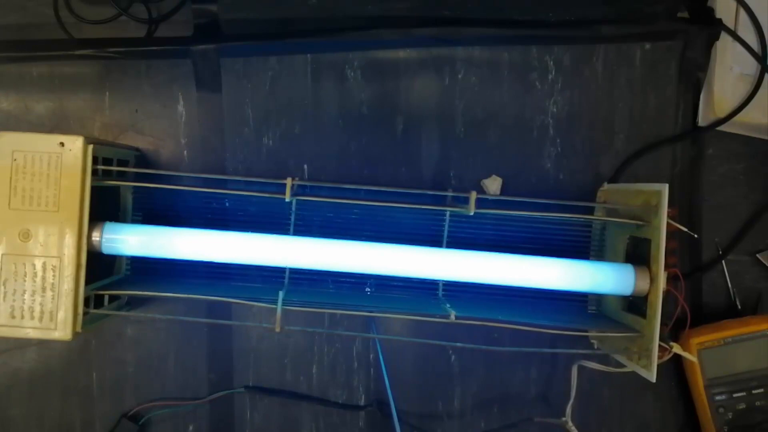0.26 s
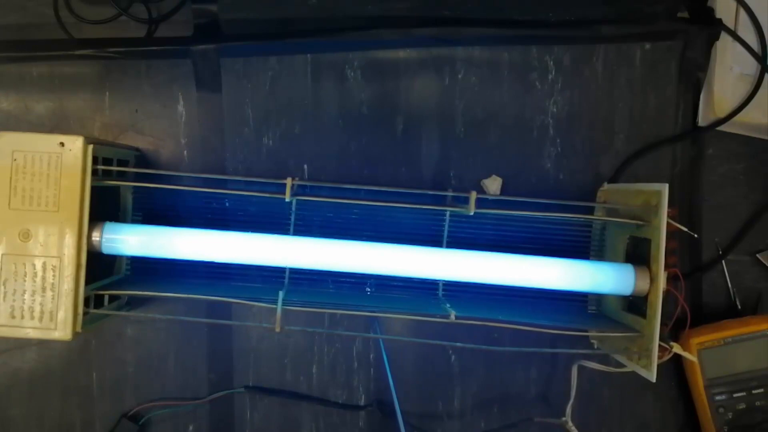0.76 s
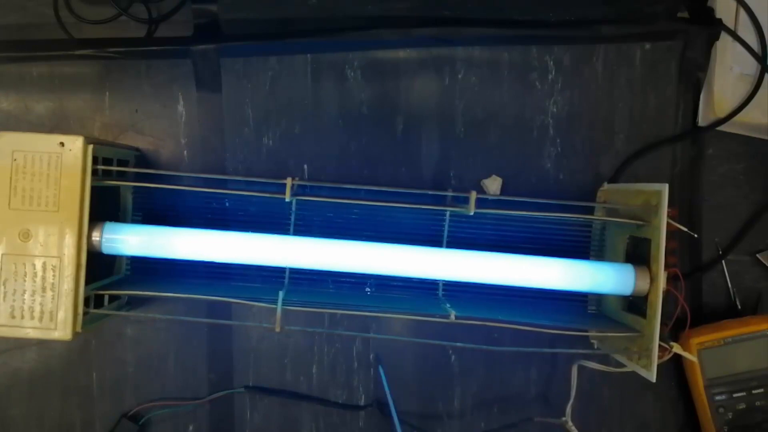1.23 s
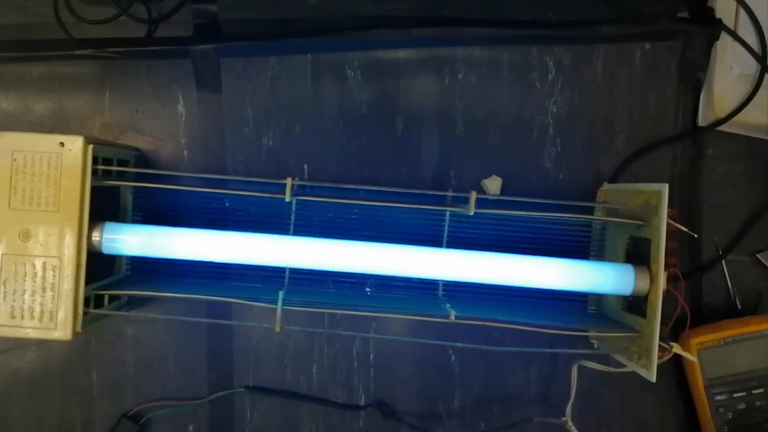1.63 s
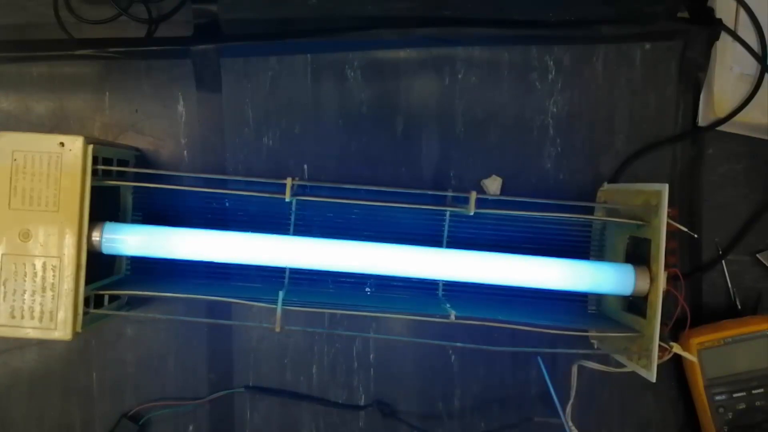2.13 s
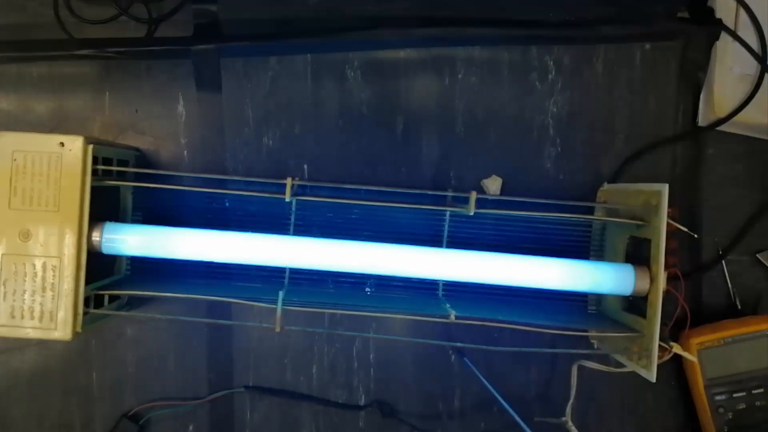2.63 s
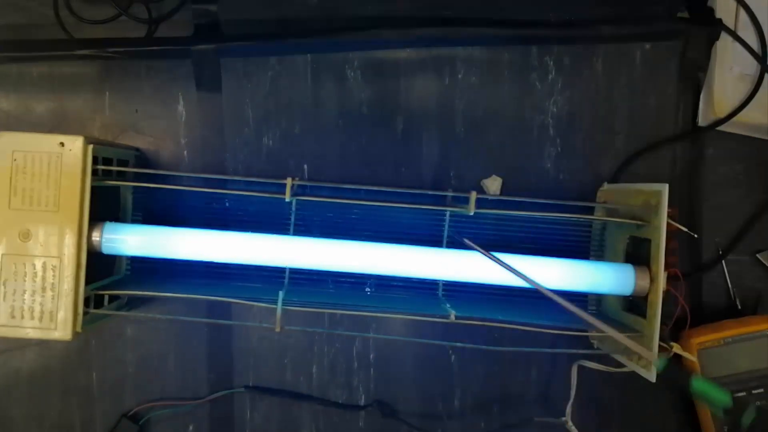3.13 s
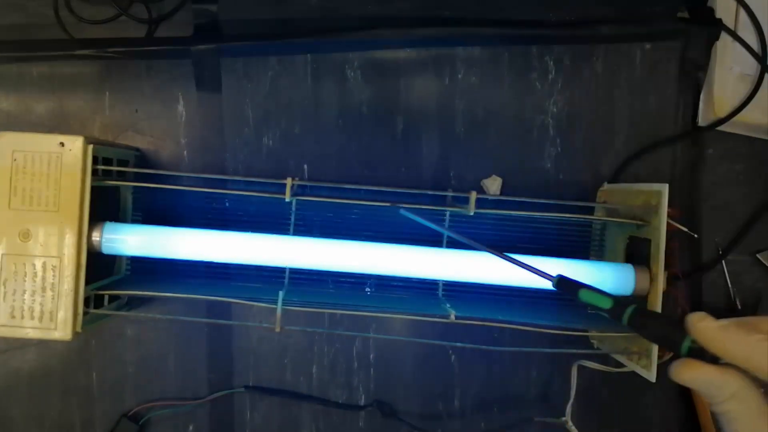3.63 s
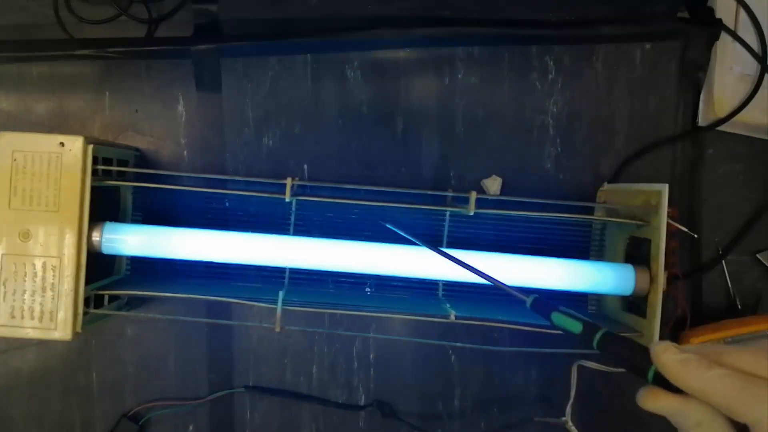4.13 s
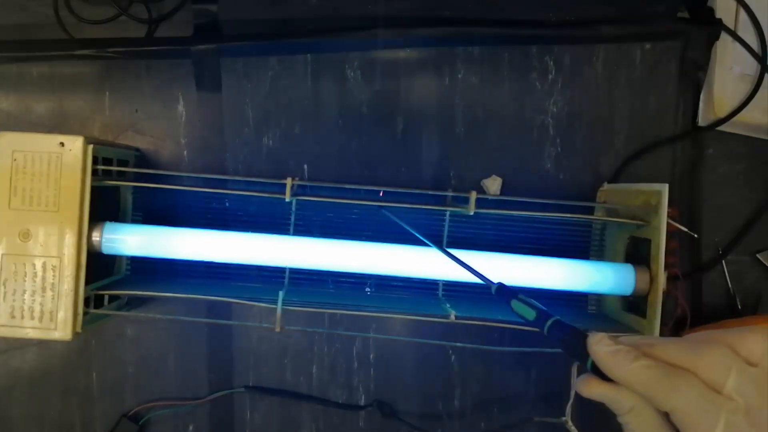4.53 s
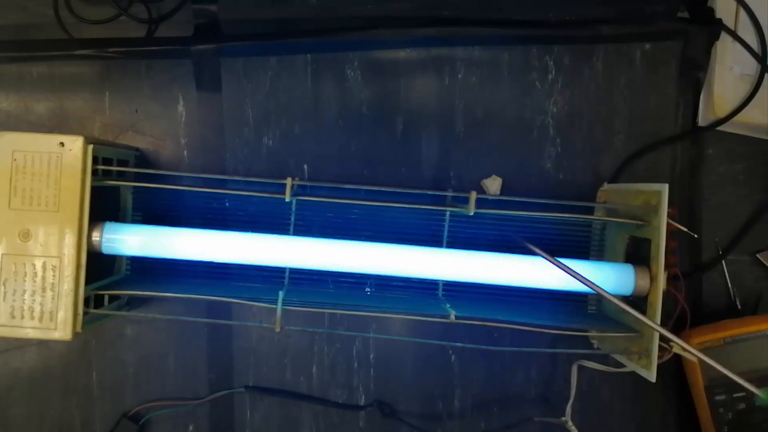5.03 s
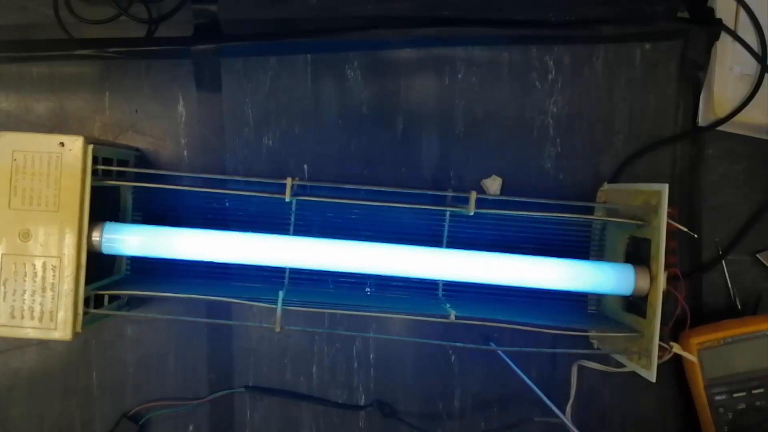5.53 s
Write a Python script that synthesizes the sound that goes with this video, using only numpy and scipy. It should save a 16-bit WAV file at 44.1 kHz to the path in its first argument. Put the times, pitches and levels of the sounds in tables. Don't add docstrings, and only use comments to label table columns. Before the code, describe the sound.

In a small workshop, a faint low electrical hum, soft room rumble and airy hiss are broken by a sudden deafening spark crack. The background drops, then creeps back. Faint sleeve rustles, bench knocks and tool ticks follow, then a second, stronger crack. Close stereo microphone overloads on both.

```python
import sys
import numpy as np
from scipy import signal
from scipy.io import wavfile

SR = 44100
rng = np.random.default_rng(int(sys.argv[2]) if len(sys.argv) > 2 else 0)


def master_out(mix):
    frames = np.transpose(np.atleast_2d(mix))
    ceiling = np.clip(frames, -1, 1)
    pcm = np.round(ceiling * 32767).astype(np.int16)
    wavfile.write(sys.argv[1], SR, pcm)


def volts_from_db(level):
    exponent = np.asarray(level, float) / 20
    return 10 ** exponent


N = 254080

# centre_hz, density_db_per_hz, left_right_likeness
AIR_SPECTRUM = [(25, -84, 0.48), (58.4, -84.5, 0.98), (128, -89, 0.64), (276, -91, 0.9), (567, -93, 0.29),
                (758.1, -96, 0.046), (1100, -101, -0.02), (1660, -110, -.2), (2280, -110, 0.56),
                (3300, -106, 1), (3940, -116, -2.02), (5900, -119, 1), (9000, -124, 1),
                (14000, -131, -2.04)]
# time_s, level_db
NOISE_STIR = [(0, -2), (.5, -0.5), (1.0, 2.5), (1.55, 0), (1.8, -3), (2.1, -3.5), (2.5, -1), (2.9, -1.5),
              (3.3, -0.1), (3.7, -0.6), (4.0, 2), (4.4, -1.5), (4.9, 4), (5.3, -0.5), (5.5, -2), (5.76, -1)]
# centre_hz, width_hz, level_db
CAPSULE_PEAK = [(14900, 900, 9)]
# centre_hz, width_hz, level_db
ROOM_MODES = [(74.1, 18, -66), (101.36, 9.6, -79.5), (305.4, 14, -71.5), (491.5, 25, -72.5)]
# top_s, level_db, half_length_s
RUMBLE_SWELLS = [(0.02, -58.5, 0.18), (0.605, -57, 0.12), (0.993, -60, .1), (1.559, -60.5, .14),
                 (2.063, -64, 0.047), (2.46, -64, 0.1), (3.04, -63.5, 0.13), (3.352, -60.5, 0.093),
                 (3.597, -64, 0.085), (3.93, -64, 0.16), (4.412, -62.5, 0.15), (4.9, -60, .08),
                 (5.35, -58, 0.15)]
# top_s, level_db, rise_s, fall_s
SLEEVE_RUSTLES = [(1.97, -69.5, 0.048, .06), (2.46, -70.5, 0.27, 0.22), (2.645, -62, 0.014, 0.076),
                  (2.82, -71, 0.042, .06), (3.2, -71, 0.27, .05), (3.33, -60.5, 0.052, .04),
                  (3.775, -64, .004, .04), (3.88, -67, 0.031, .03), (3.975, -62.5, 0.035, 0.023),
                  (4.5, -71, 0.073, .06), (5.3, -75, .1, 0.097)]
# start_s, peak_db, top_hz
HANDLE_TICKS = [
    (2.459, -62, 11910),
    (3.2858, -48, 7500),
    (3.3007, -55, 15000),
    (3.317, -49, 7500),
    (3.5327, -63.5, 9000),
    (3.596, -57, 9000),
    (3.671, -64, 9000),
]
# start_s, level_db, pitch_hz, fade_s
BENCH_KNOCKS = [
    (1.927, -36.5, 70.5, 0.0068),
    (2.04, -46, 55.4, 0.011),
    (3.785, -53, 676, 0.011),
    (3.78, -58, 955, 0.013),
    (3.928, -61.5, 962, 0.017),
    (4.0, -65, 958, 0.033),
]
# start_s, crack_db, room_db, tail_pace (1 = normal)
SPARKS = [
    (1.108, 1.5, 5, 0.95),
    (4.618, 5, 4.5, 1.025),
]
# centre_hz, density_db_per_hz, extra_decay_db_per_s
TAIL_SPECTRUM = [(150, -89, 150.5), (400, -86, 100.5), (700, -86.5, 36), (1040, -81.5, 32),
                 (1600, -73.5, 20.5), (2460, -73.5, 19), (3496, -73.5, 6.5), (4860, -71, -0.5),
                 (6030, -69, -2), (7926, -67.5, 27.5), (10400, -62.5, 39.5), (12500, -73, 52.5),
                 (13800, -67, 40), (15000, -71.5, 70)]
# pitch_hz, left_db, right_db, fade_s
SPARK_RINGS = [
    [(720, -15, -14.5, 0.0016), (1116, -21.5, -17.5, 0.0029), (2010, -20.5, -2, 0.00099),
     (9760, -9, -31, .003)],
    [(1007, -33.5, -28.5, .003), (2000, -7.5, -26, 0.0011), (3134, -12, -15, 0.0016),
     (6230, -24.5, 4, 0.00081)],
]
# left_swing_db, right_sag_db, left_sag_share, recovery_db, lead_in_db
OVERLOAD = [
    (-6.5, -4, 0.14, -33, -14.5),
    (-11.5, -4, -0.14, -33.5, -23.5),
]
# centre_hz, width_hz, level_db
LEFT_PORT = [(10000, 2400, 4.5), (9660, 4700, 5), (3820, 2700, -4.5)]
RIGHT_PORT = [(5500, 4600, 13), (4125, 850, -12.5), (8600, 2400, -22)]

HUM_HZ, HUM_DB, HUM_FOLLOWS_STIR = 200.1, -61.5, 0.52
RUMBLE_HZ, RUMBLE_BED_DB = 46.3, -78
DUCK_BASS_DB, DUCK_TREBLE_DB, DUCK_LEFT_OVER_DB = -17.5, -20, -1.5
DUCK_FALL_S, DUCK_HOLD_S, DUCK_RELEASE_S = 0.015, 0.23, 0.13
DUCK_HISS_DB, DUCK_HISS_RELEASE_S = -7, 0.31
FIRST_ECHO_DB, FIRST_ECHO_S, DECAY_DB_PER_S = 10, 0.008, 66.5
GATE_S, GATE_DB_PER_S, GATE_KNEE_S, GATE_DEPTH_DB, GATE_FOLLOWS = 0.32, 260, 0.03, 29, 0.0016
LEFT_BASS_CUT_HZ, LEFT_LAG_SAMPLES, RIGHT_DB, SELF_NOISE_DB = 61, 2, 2, -80.5


def at_hz(spectrum, hz, column=1):
    table = np.array(spectrum)
    return np.interp(np.log(hz), np.log(table[:, 0]), table[:, column])


def stir_db():
    times_s, levels_db = np.transpose(NOISE_STIR)
    return np.interp(np.arange(N) / SR, times_s, levels_db)


def add_at(out, start_s, sound):
    out[:, round(start_s * SR):][:, :sound.shape[-1]] += sound


def drift(rate_hz, size):
    r = np.exp(-80 * np.pi * rate_hz / SR)
    white = rng.standard_normal(size // 40 + 2002)
    slow = signal.lfilter([1], [1, -2 * r, r * r], white)[2000:]
    return np.interp(np.arange(size) / 40, np.arange(len(slow)), slow / slow.std())


def band_pass(x, low_hz, high_hz, order=2):
    return signal.sosfilt(signal.butter(order, [low_hz, high_hz], "band", fs=SR, output="sos"), x)


def bands(size, low_hz):
    edges = low_hz * 2 ** (np.arange(40) / 3)
    edges = edges[edges < 0.45 * SR]
    white = rng.standard_normal((2, 2, size)) * np.sqrt(SR / 2)
    for k, (low, high) in enumerate(zip(edges, edges[1:])):
        yield np.sqrt(low * high), band_pass(white[k % 2], low, high, order=3)


def narrow_noise(hz, width_hz):
    x = band_pass(rng.standard_normal(N + SR), hz - width_hz / 2, hz + width_hz / 2)[SR:]
    return x / x.std()


def peaks(x, table):
    for hz, width_hz, db in table:
        w, a = 2 * np.pi * hz / SR, volts_from_db(db / 2)
        q = np.sin(w) * width_hz / hz / 2
        rise = [1 + q * a, -2 * np.cos(w), 1 - q * a]
        fall = [1 + q / a, -2 * np.cos(w), 1 - q / a]
        x = signal.lfilter(rise, fall, x)
    return x


def humps(rows):
    t = np.arange(N) / SR
    total = 0
    for top_s, db, rise_s, fall_s in rows:
        distance = np.where(t < top_s, (top_s - t) / rise_s, (t - top_s) / fall_s)
        total = total + volts_from_db(db) * np.exp(-distance ** 1.5)
    return total


def ducking():
    depth, hiss_depth, left_over_db = 0, 0, 0
    for start_s, _, _, pace in SPARKS:
        after = np.maximum(np.arange(N) / SR - start_s, 0) * pace
        held = np.maximum(after - DUCK_HOLD_S, 0)
        depth = depth + (1 - np.exp(-after / DUCK_FALL_S)) * np.exp(-held / DUCK_RELEASE_S)
        hiss_depth = hiss_depth + (after > 0) * np.exp(-(held / DUCK_HISS_RELEASE_S) ** 2)
        left_over_db = left_over_db + DUCK_LEFT_OVER_DB * (after > 0)
    bass_db = left_over_db + DUCK_BASS_DB * depth
    treble_db = left_over_db + DUCK_TREBLE_DB * depth
    return bass_db, treble_db, DUCK_HISS_DB * hiss_depth


def capsule_hiss(hiss_db, treble_db):
    level_db = SELF_NOISE_DB + hiss_db + 0.4 * treble_db + stir_db()
    hiss = np.diff(rng.standard_normal((2, N + 1))) * volts_from_db(level_db)
    return signal.sosfilt(signal.butter(2, 12000, fs=SR, output="sos"), peaks(hiss, CAPSULE_PEAK))


def air(bass_db, treble_db):
    out, together, stir = 0, drift(1.5, N), stir_db()
    for hz, (mid, side) in bands(N, low_hz=20.47):
        alike = np.clip(at_hz(AIR_SPECTRUM, hz, column=2), -1, 1)
        treble_share = np.clip(np.log2(hz / 500) / 0.68, 0, 1)
        duck_db = bass_db + treble_share * (treble_db - bass_db)
        waver_db = 1.1 * together + 0.96 * drift(6, N)
        gain = volts_from_db(at_hz(AIR_SPECTRUM, hz) + duck_db + treble_share * stir + waver_db)
        stereo = np.sqrt(1 + alike) * mid + np.sqrt(1 - alike) * side * [[1], [-1]]
        out = out + gain * stereo / np.sqrt(2)
    return out


def transformer_hum():
    phase = 2 * np.pi * np.cumsum(HUM_HZ + 0.83 * drift(1.2, N)) / SR
    level_db = HUM_DB + HUM_FOLLOWS_STIR * stir_db() + 1.1 * drift(8.3, N)
    return np.sqrt(2) * volts_from_db(level_db) * np.sin(phase)


def room_rumble():
    phase = 2 * np.pi * np.cumsum(RUMBLE_HZ + 3 * drift(4, N)) / SR
    swells = humps([(top_s, db, half_s, half_s) for top_s, db, half_s in RUMBLE_SWELLS])
    rumble = (swells + volts_from_db(RUMBLE_BED_DB)) * volts_from_db(9 + 2.0 * drift(6, N)) * np.sin(phase)
    modes = sum(volts_from_db(db) * narrow_noise(hz, width_hz) for hz, width_hz, db in ROOM_MODES)
    return rumble + modes


def sleeve_rustle():
    grains = rng.standard_normal((2, N)) * volts_from_db(2.0 * drift(60, N) - 2) * humps(SLEEVE_RUSTLES)
    return band_pass(grains, 3500, 7000) + volts_from_db(-7) * band_pass(grains, 7000, 14000)


def handle_ticks():
    out, t = np.zeros((2, N)), np.arange(SR // 12) / SR
    fade = np.exp(-t / 0.0005) + 0.5 * np.exp(-t / 0.0045)
    for start_s, db, top_hz in HANDLE_TICKS:
        puff = volts_from_db(db - 5.0) * fade * rng.standard_normal((2, len(t)))
        add_at(out, start_s, band_pass(puff, 2800, top_hz))
    return out


def bench_knocks():
    out, t = np.zeros((2, N)), np.arange(SR // 12) / SR
    for start_s, db, hz, fade_s in BENCH_KNOCKS:
        soft_onset = np.tanh(t / 0.0024)
        add_at(out, start_s, volts_from_db(db) * np.sin(2 * np.pi * hz * t) * np.exp(-t / fade_s) * soft_onset)
    return out


def lead_in_pulse():
    out, t = np.zeros((2, N)), np.arange(SR * 9 // 10) / SR
    pulse = np.sin(np.pi * np.clip(t / 0.00086, 0, 1)) ** 2
    for (start_s, *_), (*_, lead_in_db) in zip(SPARKS, OVERLOAD):
        add_at(out, start_s - 0.0016, pulse * volts_from_db(lead_in_db) * [[0.6], [1]])
    return out


def input_overload():
    out, t = np.zeros((2, N)), np.arange(SR * 9 // 10) / SR
    swing = np.sin(2 * np.pi * 315 * t + 0.9) * np.exp(-t / 0.0019)
    sag = np.exp(-(t / 0.0038) ** 2) * 0.6 - np.exp(-t / 0.0005)
    recovery = 1.3 * np.exp(-t / 0.11) - 0.3 * np.exp(-t / 0.6)
    for (start_s, *_), (left_db, right_db, left_share, recovery_db, _) in zip(SPARKS, OVERLOAD):
        left = left_share * volts_from_db(right_db) * sag - volts_from_db(left_db) * swing
        right = volts_from_db(recovery_db) * recovery - volts_from_db(right_db) * sag
        add_at(out, start_s, np.array([left, right]))
    return out


def struck_parts():
    out, t = np.zeros((2, N)), np.arange(SR * 9 // 10) / SR
    for (start_s, *_), rings in zip(SPARKS, SPARK_RINGS):
        for hz, left_db, right_db, fade_s in rings:
            ring = np.sin(2 * np.pi * hz * t) * np.exp(-t / fade_s)
            add_at(out, start_s, np.outer(volts_from_db([left_db, right_db]), ring))
    return out


def tail_db(after, extra_db_per_s):
    late = after - GATE_S + GATE_FOLLOWS * extra_db_per_s
    shut_db = GATE_DB_PER_S * GATE_KNEE_S * np.log1p(np.exp(late / GATE_KNEE_S))
    gate_db = GATE_DEPTH_DB * np.tanh(shut_db / GATE_DEPTH_DB)
    early_db = FIRST_ECHO_DB * np.exp(-(after / FIRST_ECHO_S) ** 2)
    return early_db - 3.0 - (DECAY_DB_PER_S + extra_db_per_s) * after - gate_db


def room_tail(t, pace):
    tail = 0
    for hz, noise in bands(len(t), low_hz=127.12):
        decay_db = tail_db(t * pace, at_hz(TAIL_SPECTRUM, hz, column=2))
        tail = tail + volts_from_db(at_hz(TAIL_SPECTRUM, hz) + decay_db) * noise
    return tail * volts_from_db(2.0 * np.array([drift(150, len(t)), drift(160, len(t))]))


def sparks():
    out, t = np.zeros((2, N)), np.arange(SR * 6 // 10) / SR
    for start_s, crack_db, room_db, pace in SPARKS:
        shock = np.where(t < 0.00012, 1 - t / 0.00006, 0) * [[-1], [1]]
        scatter = rng.standard_normal((2, len(t))) * np.exp(-t / 0.0014) * 0.35
        scatter = signal.lfilter(*signal.butter(1, 3500, fs=SR), scatter)
        crack = volts_from_db(crack_db) * (shock + scatter)
        add_at(out, start_s, crack + room_tail(t, pace) * volts_from_db(room_db))
    return out


def scene():
    bass_db, treble_db, hiss_db = ducking()
    steady = air(bass_db, treble_db) + (transformer_hum() + room_rumble()) * volts_from_db(bass_db)
    left, right = steady + sleeve_rustle() + handle_ticks() + bench_knocks()
    left = signal.filtfilt(*signal.butter(1, LEFT_BASS_CUT_HZ, "high", fs=SR), left)
    left = np.roll(left, LEFT_LAG_SAMPLES)
    crack_left, crack_right = sparks()
    left_port = peaks(left + crack_left, LEFT_PORT)
    right_port = volts_from_db(RIGHT_DB) * peaks(right + crack_right, RIGHT_PORT)
    ports = np.tanh(np.array([left_port, right_port]) / 0.82) * 0.83
    bypassing_ports = lead_in_pulse() + input_overload() + struck_parts()
    return ports + capsule_hiss(hiss_db, treble_db) + bypassing_ports


def band_limit(x):
    return signal.sosfilt(signal.butter(12, 16550, fs=SR, output="sos"), x)


def record(dry):
    limited = np.clip(dry, -1.05, 1.05)
    top_cut = signal.ellip(8, 0.5, 50, 15450, fs=SR, output="sos")
    mix = signal.sosfilt(top_cut, limited)
    return band_limit(mix)


dry = scene()
out = record(dry)
master_out(out)
```